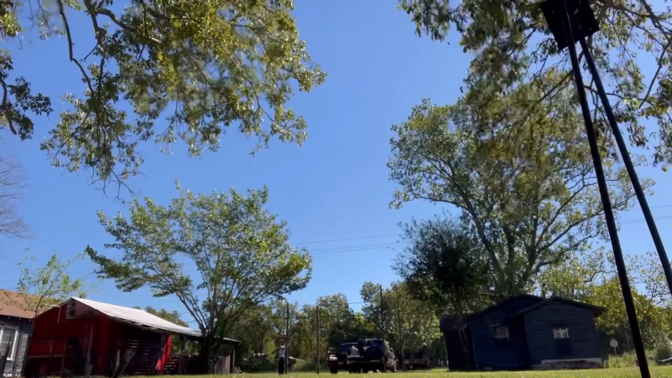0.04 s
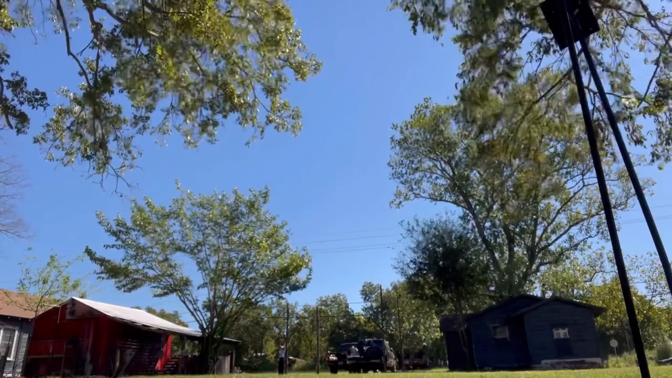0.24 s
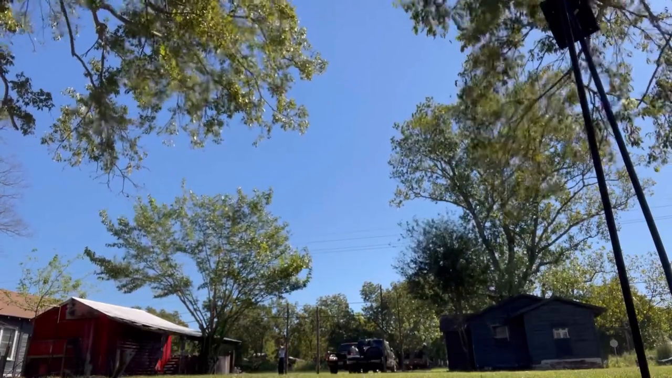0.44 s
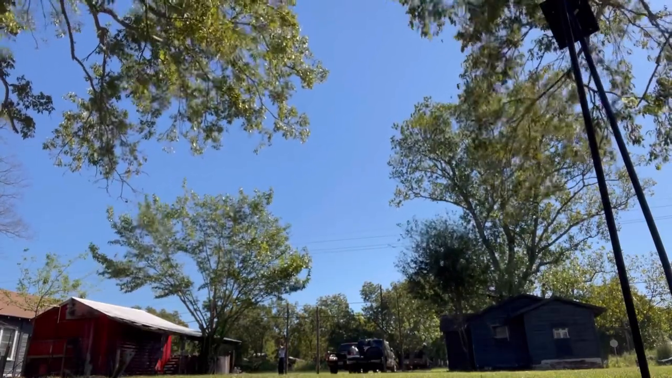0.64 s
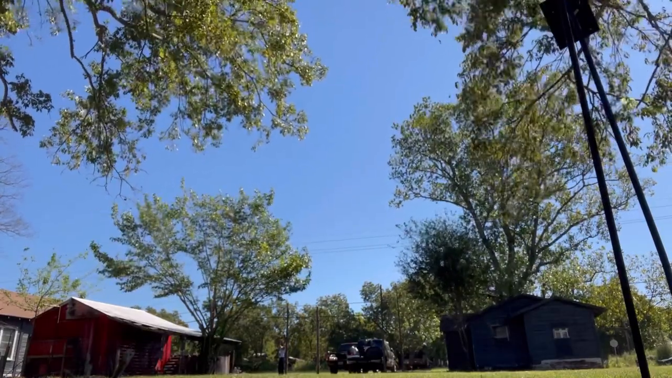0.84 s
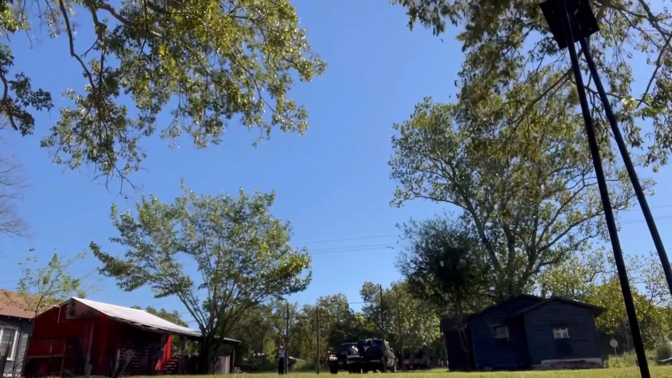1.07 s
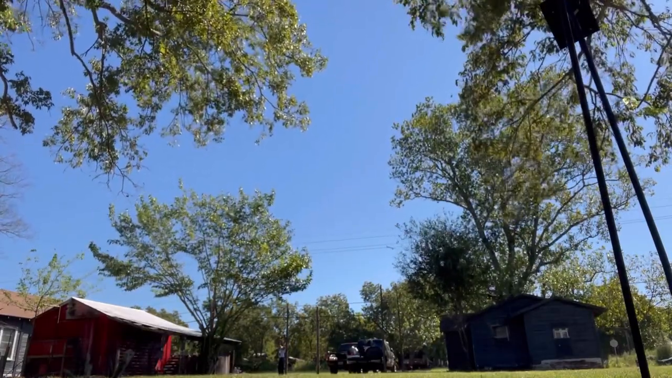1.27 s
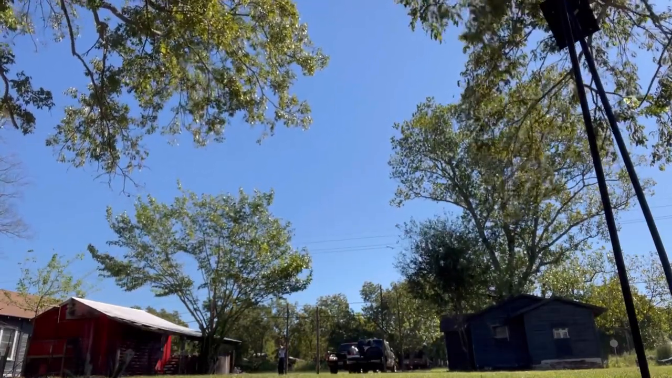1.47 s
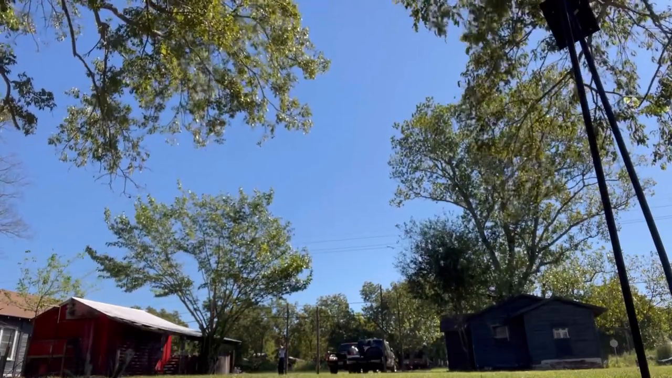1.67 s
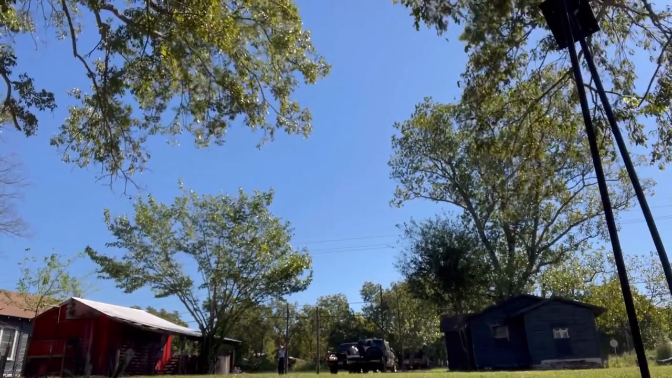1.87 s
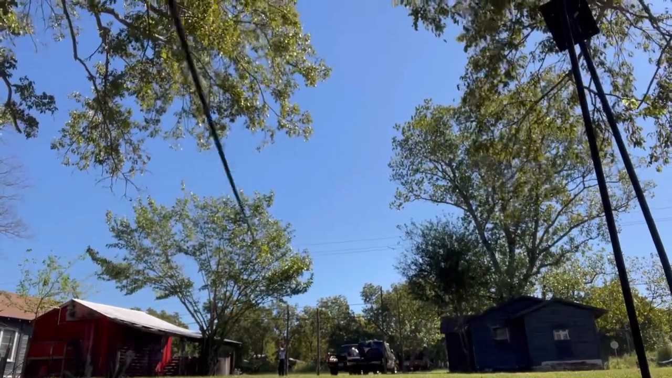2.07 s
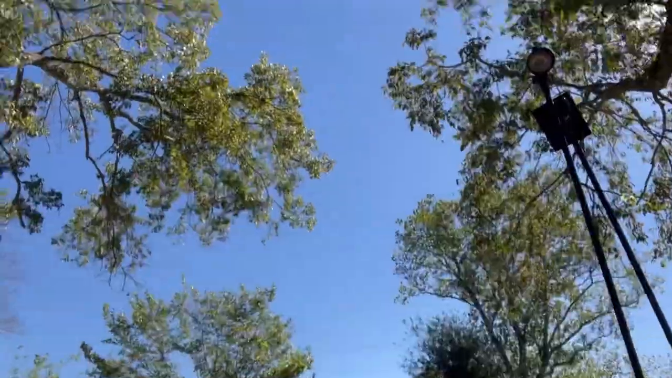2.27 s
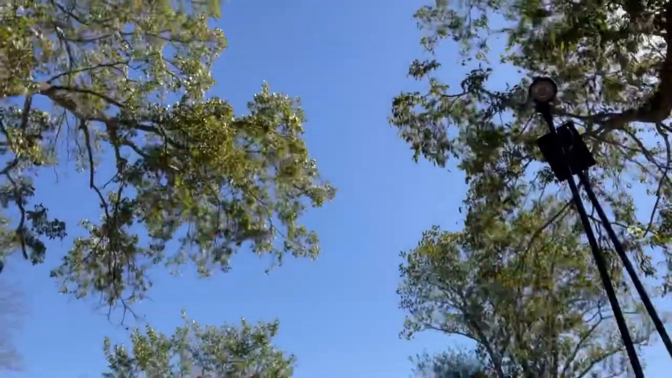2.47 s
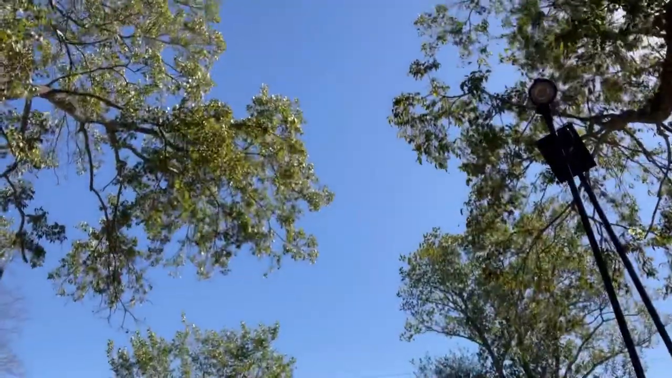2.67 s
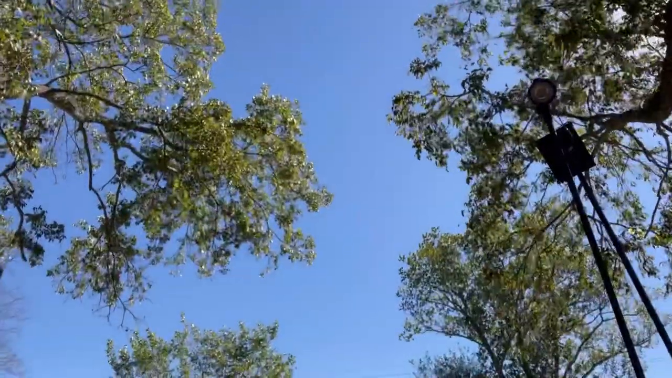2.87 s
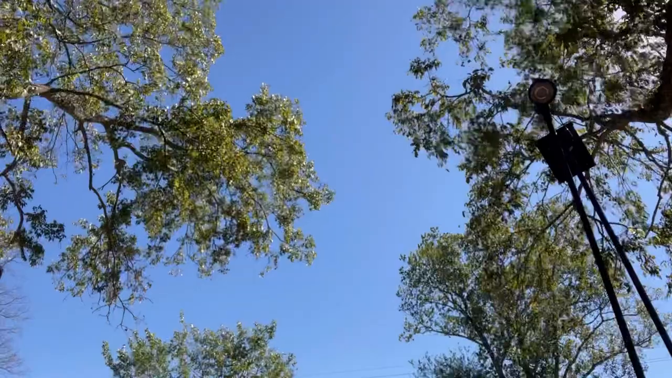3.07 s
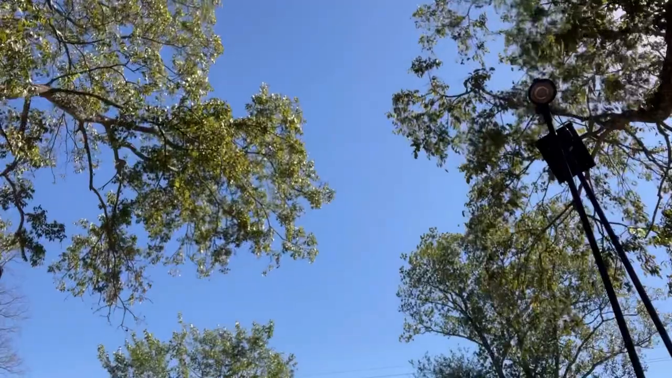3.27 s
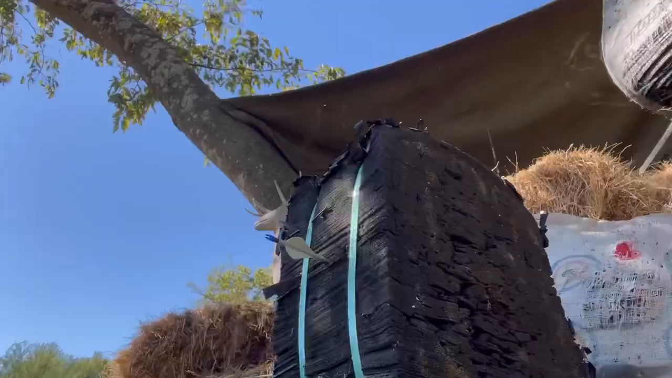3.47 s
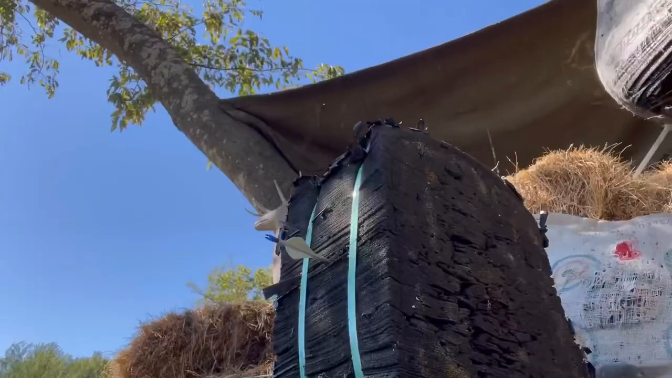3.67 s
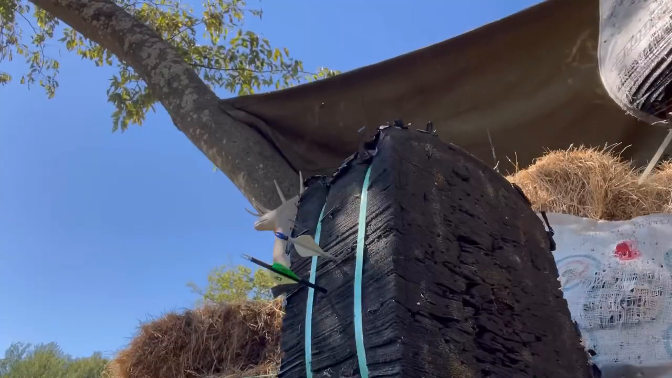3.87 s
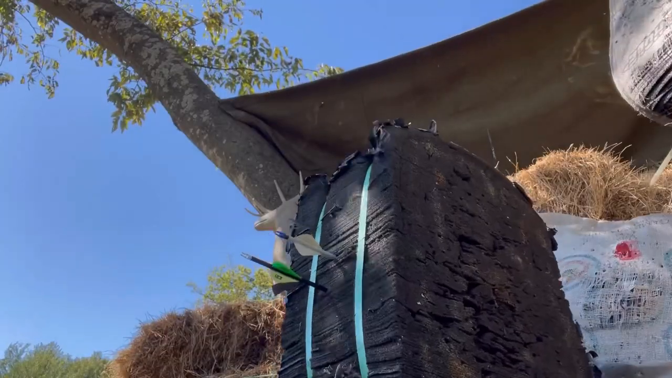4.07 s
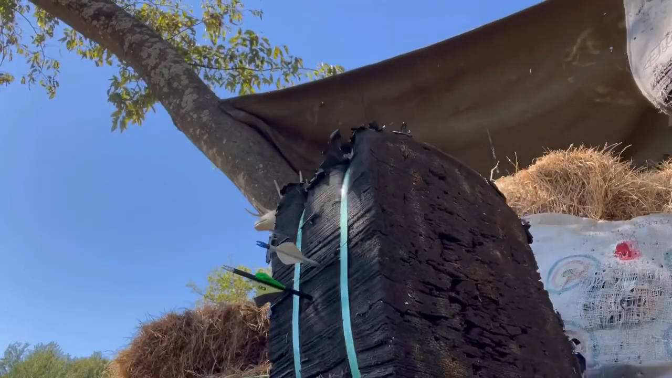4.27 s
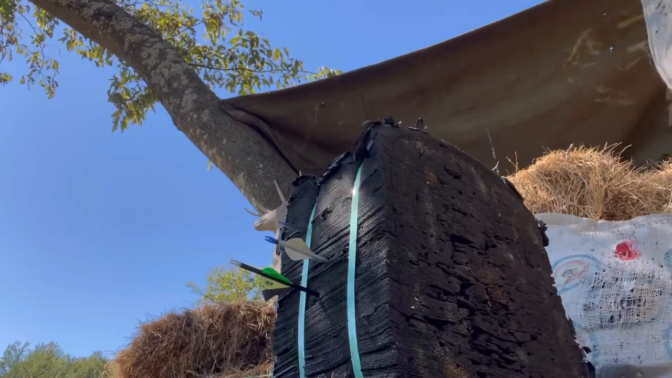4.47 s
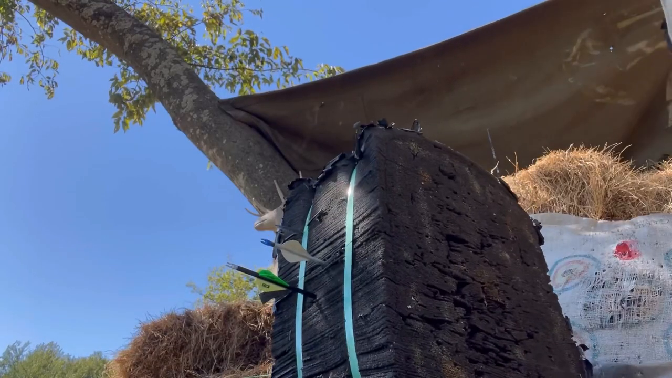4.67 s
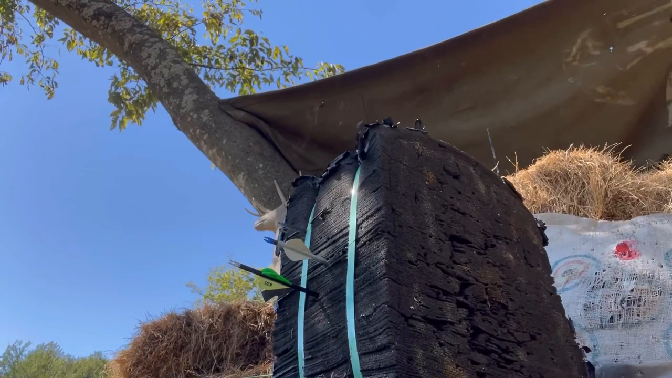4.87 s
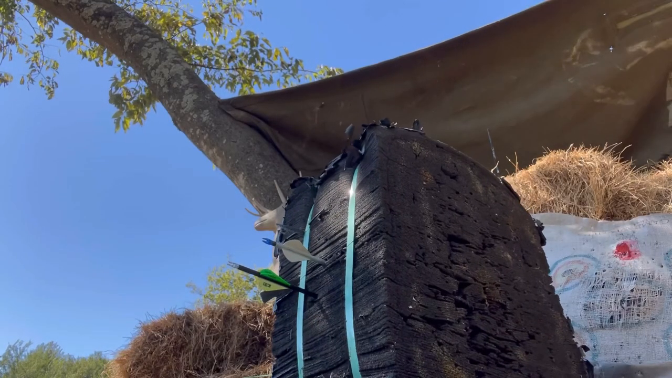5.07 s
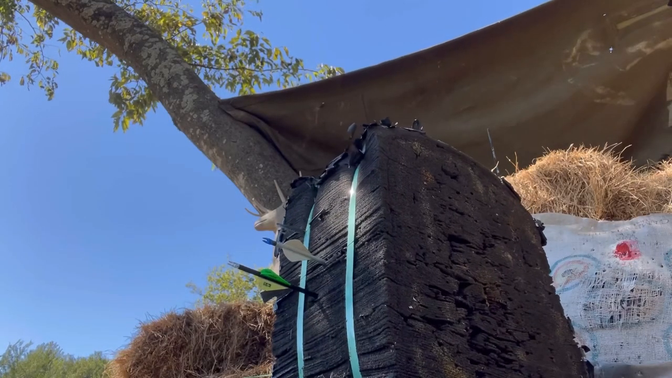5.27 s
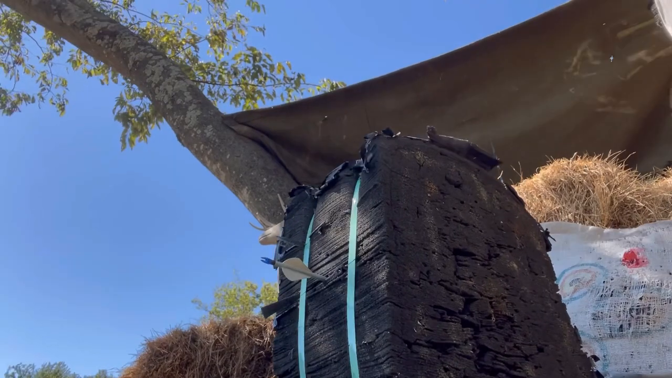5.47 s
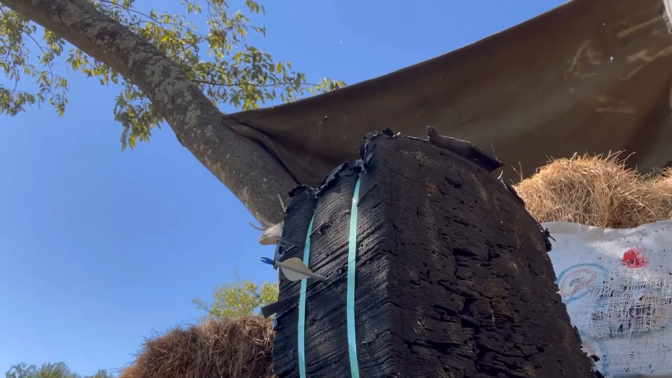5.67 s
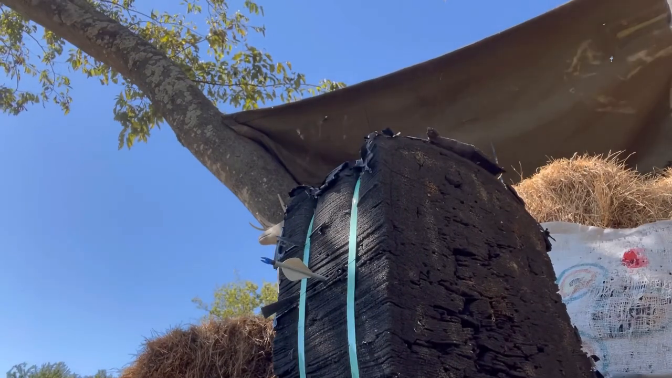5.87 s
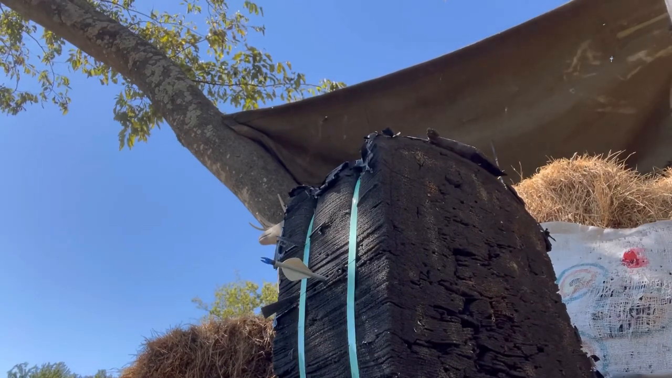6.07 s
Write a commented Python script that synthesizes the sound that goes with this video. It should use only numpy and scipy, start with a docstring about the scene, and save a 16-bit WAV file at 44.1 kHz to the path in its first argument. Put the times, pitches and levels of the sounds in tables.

```python
"""A yard, with the microphone right beside a layered foam target block: two arrows thwack into it.
A faint far bow precedes each crack and thud; only the first shot has a hiss of vanes.
After the first hit the microphone slides and ticks on its rest; after the second the straw rustles.
The distant background, of coloured noise, changes abruptly three times; a hum and a rush open it.
Friction is grainy noise; blows are short pushes that ring the modes of the struck body."""
import sys
import numpy as np
from scipy import signal
from scipy.fft import rfft, irfft, next_fast_len
from scipy.io import wavfile

SR = 44100
rng = np.random.default_rng(int(sys.argv[2]) if len(sys.argv) > 2 else 0)


def store_pcm(level_fs):
    """Save levels as 16-bit WAV."""
    pcm = np.round(np.clip(level_fs, -1, 1) * 32767).astype(np.int16)
    wavfile.write(sys.argv[1], SR, np.atleast_2d(pcm).T)


N = 269803
TIME = np.arange(N) / SR  # s


def from_db(db):
    """Decibels to gain."""
    return 10 ** (np.asarray(db) / 20)


def panned(pan_db):
    """Left and right gains for a level difference; positive is louder on the left."""
    return from_db(np.array([[.5], [-.5]]) * pan_db)


def at_hz(points, hz):
    """Read a table on a log-frequency axis."""
    known_hz, values = np.transpose(points)
    return np.interp(np.log(hz + 1), np.log(known_hz), values)


def drift(rate, size=N):
    """Smooth chance with about `rate` turns a second; spread near 1."""
    return np.interp(TIME[:size] * rate, np.arange(size), rng.standard_normal(size))


def noise(spectrum, likeness, size=N):
    """Stereo noise of a given colour and left-right likeness; rms 1."""
    length = next_fast_len(size)
    hz = np.arange(length // 2 + 1) * SR / length
    mid, side = rfft(rng.standard_normal((2, length)))
    alike = np.clip(at_hz(likeness, hz), -1, 1)
    # more side than mid makes the two channels oppose each other
    pair = np.sqrt(1 + alike) * mid + np.sqrt(1 - alike) * side * [[1], [-1]]
    coloured = irfft(pair * from_db(at_hz(spectrum, hz)), length)[:, :size]
    return coloured / np.sqrt(np.mean(coloured ** 2))


# left-right likeness of rubbing close to the microphone: f/Hz, correlation
CLOSE_LIKENESS = [(100, 0.55), (600, -0.34), (2000, 0.097), (7000, -0.088)]


def friction(spectrum, grain_db, size=N):
    """Close noise that stick and slip make grainy; rms near 1."""
    grain = from_db(grain_db * drift(900, size))
    return noise(spectrum, CLOSE_LIKENESS, size) * grain / np.sqrt(np.mean(grain ** 2))


def strokes(rows, spectrum, rise_s, fall_s, grain_db, pan_db=0):
    """Friction that swells by 60 dB to each peak in rise_s and dies by 60 dB in fall_s."""
    out, size = np.zeros((2, N)), SR
    texture = friction(spectrum, grain_db, size)
    for peak_s, db in rows:
        begin = max(int((peak_s - rise_s) * SR), 0)
        end = min(int((peak_s + fall_s) * SR), N)
        at = np.arange(begin, end)
        age = TIME[at] - peak_s
        envelope = from_db(db - 60 * np.maximum(-age / rise_s, age / fall_s))
        out[:, at] += envelope * texture[:, at % size]  # one second of texture serves all strokes
    return panned(pan_db) * out


def ring(force, hz, t60):
    """A damped resonator: a unit click sets a sine of height near 1 ringing."""
    radius = from_db(-60 / (t60 * SR))
    angle = 2 * np.pi * hz / SR
    feedback = [1, -2 * radius * np.cos(angle), radius * radius]
    return signal.lfilter([0, np.sin(angle)], feedback, force + 1e-18)


def struck(force, modes, left_lag_ms):
    """A force rings every mode of a body; the left side lags by left_lag_ms, or leads if negative."""
    pair = np.zeros((2, N))
    for k, (hz, db, t60, pan_db) in enumerate(modes):
        sign = (-1) ** k  # neighbouring modes start in opposite directions
        pair = pair + panned(pan_db) * from_db(db) * ring(force, hz, t60) * sign
    left, right = pair
    return np.array([np.interp(TIME - left_lag_ms / 1000, TIME, left), right])


def thud(jolts, modes, left_lag_ms):
    """Each jolt is a short push, shorter for a wider contact bandwidth, on the damped modes of a body."""
    force = np.zeros(N)
    for s, db, contact_hz in jolts:
        at = slice(int(s * SR), int(s * SR) + SR // 10)
        age = np.maximum(TIME[at] - s, 0) * 2 * np.pi * contact_hz
        push = age * np.exp(-np.minimum(age, 50))
        force[at] += from_db(db) * push / push.sum()
    return struck(force, modes, left_lag_ms)


# edges of the background stretches: t/s
CHANGES = [0, .717, 3.511, 5.42, 6.13]
# background of each stretch: level/dB at the start, level/dB at the end
STRETCH_LEVELS = [(-40, -41), (-39, -44.5), (-38, -39.5), (-39, -38.5)]
# colour of each stretch: f/Hz, relative level/dB per Hz
STRETCH_COLOURS = [
    [(55, -47), (100, -23), (180, 0.5), (230, -4), (278, 2), (318, -10), (375, 3.5), (470, -6),
     (900, -12.5), (3600, -25.5), (6500, -38), (15000, -35)],
    [(20, -36), (45, -2), (80, -7.5), (113, 2), (150, -9.5), (330, -15.5), (520, -16), (1000, -22),
     (1800, -34), (2800, -36), (4100, -33), (6300, -34.5), (8800, -48.5), (10500, -41.5), (12600, -43.5),
     (14000, -73)],
    [(20, -4), (45, -3), (113, -1.5), (150, -14.5), (300, -15.5), (600, -19), (950, -23.5), (2200, -43.5),
     (6300, -47), (12500, -53), (14500, -67)],
    [(20, -34), (70, -2.5), (129, -5), (286, -22), (460, -20), (950, -30), (2700, -51.5), (7000, -51),
     (12500, -56.5), (14500, -76)],
]
# left-right likeness while the machine hums, in the open yard, under the tarp: f/Hz, correlation
HUM_LIKENESS = [(130, 0.93), (640, 0.59), (1400, 0.58), (3100, 0)]
OPEN_LIKENESS = [(60, 0.51), (300, 0.75), (700, -0.013), (1400, -0.058), (3000, -0.25), (14000, 0.12)]
TARP_LIKENESS = [(60, 0.82), (130, 0.82), (300, 0.11), (700, -0.48), (1400, -0.085), (3000, -0.13)]


def yard(fade_s=0.0091):
    """Steady distant rumble and leaf hiss as coloured noise; the level dips briefly at each change."""
    out = np.zeros((2, N))
    likenesses = [HUM_LIKENESS, OPEN_LIKENESS, TARP_LIKENESS, TARP_LIKENESS]
    stretches = zip(CHANGES, CHANGES[1:], STRETCH_LEVELS, STRETCH_COLOURS, likenesses)
    for start, end, levels_db, colour, likeness in stretches:
        gate = np.clip(np.minimum(TIME - start, end - TIME) / fade_s, 0, 1)
        level = from_db(np.interp(TIME, [start, end], levels_db))
        out += gate * level * noise(colour, likeness)
    return out * panned(pan_db=-1.3)


def first_stretch():
    """Gate, open until the first change of background."""
    return np.clip((CHANGES[1] - TIME) / .01, 0, 1)


# swell of the far rush: t/s, level/dB
RUSH_SWELL = [(0, -50.5), (.28, -46.5), (.5, -48), (.71, -49.5)]
# its colour: f/Hz, relative level/dB per Hz
RUSH_COLOUR = [(300, -27), (900, -0.5), (1800, -3), (3200, -8.5), (4500, -13.5), (7000, -23.5)]


def rush():
    """A far rush of coloured noise swells and eases through the first stretch."""
    level = from_db(np.interp(TIME, *np.transpose(RUSH_SWELL)))
    return level * first_stretch() * noise(RUSH_COLOUR, HUM_LIKENESS)


# tones of the machine: f/Hz, relative level/dB
HUM_TONES = [(363, -50), (387.7, -57), (430.2, -64), (553.3, -48.5), (857, -60)]


def hum(waver=0.0037, level_db=-6.0):
    """Faint machine hum through the first stretch: sines whose pitches waver independently."""
    tones = np.zeros(N)
    for hz, db in HUM_TONES:
        wavering_hz = hz * (1 + waver * drift(17.6))
        tones += from_db(db) * np.sin(2 * np.pi * np.cumsum(wavering_hz) / SR)
    return from_db(level_db) * np.sqrt(2) * tones * first_stretch()


# the string slaps home on the far bow: t/s, level/dB, contact bandwidth f/Hz
STRING_SLAPS = [(1.875, -33, 9000), (3.673, -58, 7000)]
# the bow's ring: f/Hz, level/dB, t60/s, left-right/dB
BOW_MODES = [(326, -12, .025, -1), (650, -3.5, .035, -16), (3620, -3, .012, 0), (7400, -14, .005, 0)]
# hiss of the bow: peak t/s, relative level/dB
BOW_HISSES = [(1.8745, -37.5), (3.673, -40)]
# its colour: f/Hz, relative level/dB per Hz
BOW_COLOUR = [(200, 12.5), (1000, 2.5), (2700, -12), (3500, -4), (4400, -8), (6000, -15.5), (11000, -11),
              (15000, -35)]


def bows(hiss_db=3.5):
    """The far bow lets go twice: the string's push rings its modes, with a short hiss."""
    hiss = strokes(BOW_HISSES, BOW_COLOUR, rise_s=.022, fall_s=.21, grain_db=2)
    return thud(STRING_SLAPS, BOW_MODES, left_lag_ms=0.026) + from_db(hiss_db) * hiss


# vanes closing on the microphone: peak t/s, relative level/dB
VANE_PASSES = [(2.098, -40.5)]
# their colour: f/Hz, relative level/dB per Hz
VANE_COLOUR = [(2000, -23.5), (5700, -17), (6300, -2), (6900, -20), (14000, -27)]


def vanes(level_db=-1.0):
    """The first arrow's vanes whistle in: narrow noise swells up to the hit and stops short."""
    return from_db(level_db) * strokes(VANE_PASSES, VANE_COLOUR, rise_s=.22, fall_s=.01, grain_db=1)


# straw rustling by the block: peak t/s, relative level/dB
RUSTLES = [(4.101, -40)]
# thin flicks of straw after the hits: peak t/s, relative level/dB
STRAW_FLICKS = [(2.444, -45), (2.6722, -35.5), (2.7998, -50), (2.8233, -49), (4.104, -40), (4.1105, -39),
                (4.1178, -39), (4.1254, -35), (4.1434, -46), (4.1535, -41), (4.2012, -49), (4.3241, -48),
                (5.0389, -45)]
# colours of the rustle's body, and of its bright part and the flicks: f/Hz, relative level/dB per Hz
RUSTLE_COLOUR = [(100, -1), (400, 4), (900, -0.5), (1600, -4), (2600, -31), (10000, -22)]
BRIGHT_STRAW_COLOUR = [(1500, 14.5), (4000, 2.5), (7000, 11), (11000, 13.5), (16000, -1)]


def straw(bright_db=-8.0, flick_db=-4):
    """Rubbing straw rustles once after the second hit; after both, a few stalks flick back."""
    body = strokes(RUSTLES, RUSTLE_COLOUR, rise_s=.2, fall_s=.6, grain_db=5)
    bright = strokes(RUSTLES, BRIGHT_STRAW_COLOUR, rise_s=0.19, fall_s=0.078, grain_db=7.0)
    flicks = strokes(STRAW_FLICKS, BRIGHT_STRAW_COLOUR, rise_s=.002, fall_s=.016, grain_db=2)
    return body + from_db(bright_db) * bright + from_db(flick_db) * flicks


# microphone knocking and catching on its rest: t/s, level/dB, contact bandwidth f/Hz
MIC_TICKS = [(2.1715, -26, 6000), (2.2255, -28, 16000), (2.2335, -20.5, 8000), (2.2873, -25, 16000),
             (2.3187, -20, 6000), (2.324, -20, 6000), (2.3372, -16, 7000), (2.3432, -17, 7000),
             (2.3585, -15, 16000), (2.375, -5, 450), (2.3845, -11.5, 2500), (2.463, -21.5, 12000),
             (2.475, -23, 2200), (2.5195, -29, 10000)]
# the rest's dead ring: f/Hz, level/dB, t60/s, left-right/dB
REST_MODES = [(172, -15.5, 0.026, 1.5), (336, -11, 0.014, 0.5), (674.5, -16.5, 0.019, -13.5),
              (1336, -8, 0.0043, 10.5), (3600, -3, 0.0031, 2), (6050, -2, 0.0051, 5),
              (10900, -9, 0.0041, -3.5)]
# colour of the grit: f/Hz, relative level/dB per Hz
GRIT_COLOUR = [(200, 21), (700, 5.5), (2000, -6), (7000, 8.5), (10000, -3.5), (16000, -40)]
HARD_CONTACT_HZ = 4000  # only contacts harder than this grate


def ticks(grit_db=-10.5):
    """The microphone knocks on its rest and rings it; the harder ticks have a little grit around them."""
    gritty = [(s, db + grit_db) for s, db, contact_hz in MIC_TICKS if contact_hz > HARD_CONTACT_HZ]
    grit = strokes(gritty, GRIT_COLOUR, rise_s=.005, fall_s=.022, grain_db=3)
    return thud(MIC_TICKS, REST_MODES, left_lag_ms=-0.06) + grit


# speed of the creeping, sliding microphone, as the relative level of its scrape: t/s, level/dB
SLIDE_SPEED = [(2.112, -62), (2.148, -40.5), (2.16, -49), (2.195, -45), (2.212, -59.5), (2.23, -41.5),
               (2.26, -65), (2.29, -47.5), (2.346, -29), (2.384, -31), (2.404, -45.5), (2.425, -53.5),
               (2.47, -50), (2.508, -49.5), (2.53, -61.5), (2.57, -51.5), (2.62, -63), (2.74, -64)]
# colour of the scrape: f/Hz, relative level/dB per Hz
SCRAPE_COLOUR = [(30, -5), (70, 1.5), (300, -5), (700, -3), (1100, -12), (1800, -12.5), (2400, -11.5),
                 (4000, -13.5), (7400, -15.5), (9500, -27), (13000, -31), (16000, -54)]
SLIPS_PER_S, SLIP_DB = 300, 7  # tiny slips: mean rate, greatest strength above the speed level (dB)


def sliding(scrape_db=6.5, judder_db=2.2):
    """The microphone creeps and slides: a juddering scrape, and tiny random slips that ring the rest."""
    speed_db = np.interp(TIME, *np.transpose(SLIDE_SPEED), left=-200, right=-200)
    scrape_level = from_db(scrape_db + speed_db + judder_db * drift(170))
    scrape = scrape_level * friction(SCRAPE_COLOUR, grain_db=2.0) * panned(pan_db=6.0)
    slip_happens = rng.random(N) < SLIPS_PER_S / SR
    slips = slip_happens * rng.uniform(-1, 1, N) * from_db(speed_db + SLIP_DB)
    return scrape + struck(slips, REST_MODES, left_lag_ms=-0.096)


# bumps of the sliding microphone: peak t/s, level/dB
MIC_BUMPS = [(2.376, -26), (2.468, -30.5), (2.525, -41)]
# their colour: f/Hz, relative level/dB per Hz
BUMP_COLOUR = [(40, -8), (150, -24), (400, -7.5), (700, -9), (1400, -28), (5000, -49)]


def bumps():
    """The microphone bumps as it comes to a stop: dull, grainy strokes of noise."""
    return strokes(MIC_BUMPS, BUMP_COLOUR, rise_s=.025, fall_s=.1, grain_db=3.5)


# the block rocking back on its stand: t/s, level/dB, contact bandwidth f/Hz
ROCKS = [(2.133, 2, 70), (2.184, 7.5, 65), (2.475, -1, 52)]
# the block's ring at the first point of impact: f/Hz, level/dB, t60/s, left-right/dB
FIRST_MODES = [(61, -18, 0.128, 3), (149, -22, .075, 4.5), (294, -7.5, 0.061, 0.5), (418, -14.5, .035, 6.5),
               (508.7, -17, 0.033, -1.2), (680, -6, 0.021, 8.5), (966, -6, 0.0059, -3),
               (2297, 1, 0.0021, -11)]


def rocking():
    """After the first hit, soft rocking stirs only the block's two lowest modes."""
    return thud(ROCKS, FIRST_MODES[:2], left_lag_ms=0.28)


# first point snapping through the face: t/s, level/dB, contact bandwidth f/Hz
FIRST_SNAPS = [(2.1021, 1.5, 12000), (2.1086, -12, 12000)]
# brief ring of the target's face: f/Hz, level/dB, t60/s, left-right/dB
FIRST_FACE = [(1845, -17.5, 0.0013, -6), (2900, -4.5, 0.005, -4), (3700, -3.5, 0.0048, -6),
              (5200, -27.5, 0.003, -6), (10700, -22.5, 0.0026, 9.5)]
# jolts of the block as the arrow enters and is stopped: t/s, level/dB, contact bandwidth f/Hz
FIRST_JOLTS = [(2.1026, 9.6, 259), (2.1072, 9.7, 312), (2.1097, 3.5, 1283), (2.1149, 6.2, 283)]
# noisy cracks, and the foam crushing: peak t/s, relative level/dB
FIRST_CRACKS = [(2.1028, -14.5), (2.1090, -19)]
FIRST_CRUSH = [(2.109, -22)]
# colours of the crack and the crush: f/Hz, relative level/dB per Hz
FIRST_CRACK_COLOUR = [(400, -12.5), (1300, 14), (2100, 10.5), (3400, 10), (4800, -2.5), (7000, -1),
                      (10000, -16.5), (16000, -10.5)]
FIRST_CRUSH_COLOUR = [(60, -15), (450, 5.5), (1100, -1.5), (1600, -9.5), (2800, -12), (11000, -30)]


def first_hit(crack_db=0.0, crush_db=2.0):
    """The point cracks through and rings the face; crushing foam stops the shaft and the block thuds."""
    snaps = thud(FIRST_SNAPS, FIRST_FACE, left_lag_ms=0)
    block = thud(FIRST_JOLTS, FIRST_MODES, left_lag_ms=0.15)
    cracks = strokes(FIRST_CRACKS, FIRST_CRACK_COLOUR, rise_s=.006, fall_s=.012, grain_db=1.5, pan_db=-3)
    crush = strokes(FIRST_CRUSH, FIRST_CRUSH_COLOUR, rise_s=0.055, fall_s=0.07, grain_db=3.5)
    return snaps + block + from_db(crack_db) * cracks + from_db(crush_db) * crush


# second point snapping through the face: t/s, level/dB, contact bandwidth f/Hz
SECOND_SNAPS = [(3.8391, 1, 9000)]
# brief ring of the face: f/Hz, level/dB, t60/s, left-right/dB
SECOND_FACE = [(1040, -9.5, .005, -7), (4100, -12.5, 0.003, -3), (7600, -12, .002, -5)]
# jolts of the block: t/s, level/dB, contact bandwidth f/Hz
SECOND_JOLTS = [(3.8389, -1.8, 2000), (3.8442, 3.3, 449), (3.8494, 8.2, 423), (3.8541, .9, 526),
                (3.8583, 4, 187)]
# the block's ring at the second point of impact: f/Hz, level/dB, t60/s, left-right/dB
SECOND_MODES = [(59, -16.5, 0.21, 3), (151.3, -14, 0.1, .8), (230, -15, 0.047, 0), (301.4, -8, .1, 0),
                (407, -5.5, 0.0184, 3), (518, -16.5, .071, 7), (754, -2.1, 0.021, -7),
                (1250, 7.5, .004, -3.5), (1385, -4.5, 0.022, -6), (1600, -19, .051, -12),
                (1820, -19, .025, -16)]
# the crack, the shaft rubbing in, the foam crushing: peak t/s, relative level/dB
SECOND_CRACKS = [(3.8392, -15)]
SHAFT_RUBS = [(3.8415, -24)]
SECOND_CRUSH = [(3.845, -21)]
# colours of the crack and shaft, and of the deep crush: f/Hz, relative level/dB per Hz
SECOND_CRACK_COLOUR = [(400, 8.5), (1500, 2), (2600, -11.5), (4000, -2), (6500, -5), (8200, -15.5),
                       (11000, -3.5), (16000, -21)]
DEEP_CRUSH_COLOUR = [(150, -32), (700, 17), (1650, -6), (2200, -29), (8000, -42)]


def second_hit(crack_db=2.0):
    """The point cracks through, the shaft rubs in, the foam crushes deeply and the block thuds."""
    snaps = thud(SECOND_SNAPS, SECOND_FACE, left_lag_ms=0.16)
    block = thud(SECOND_JOLTS, SECOND_MODES, left_lag_ms=0.19)
    crack = strokes(SECOND_CRACKS, SECOND_CRACK_COLOUR, rise_s=.008, fall_s=.006, grain_db=1.5)
    shaft = strokes(SHAFT_RUBS, SECOND_CRACK_COLOUR, rise_s=.034, fall_s=.075, grain_db=2.5)
    crush = strokes(SECOND_CRUSH, DEEP_CRUSH_COLOUR, rise_s=.045, fall_s=.085, grain_db=2.5)
    return snaps + block + from_db(crack_db) * (crack + shaft) + crush


def scene():
    """Both shots and what they shake, over the sound of the yard."""
    background = yard() + rush() + hum()
    flights = bows() + vanes()
    aftermath = straw() + ticks() + sliding() + bumps() + rocking()
    return background + flights + aftermath + first_hit() + second_hit()


def record(dry, low_cut_hz=26, ceiling=.96, top_cut_hz=16900):
    """The deepest bass is cut away, peaks round off just under full scale, the top is cut."""
    heard = signal.sosfilt(signal.butter(2, low_cut_hz, "high", fs=SR, output="sos"), dry)
    rounded = heard / (1 + np.abs(heard / ceiling) ** 8) ** (1 / 8)
    # 70 dB down from top_cut_hz upward
    return signal.sosfilt(signal.cheby2(14, 70, top_cut_hz, fs=SR, output="sos"), rounded)


dry = scene()
out = record(dry)
store_pcm(out)
```